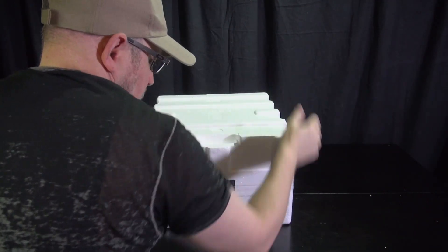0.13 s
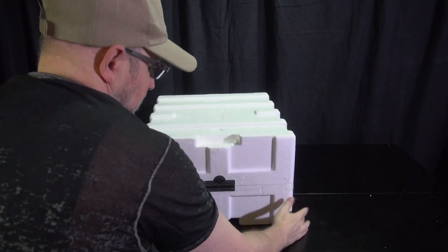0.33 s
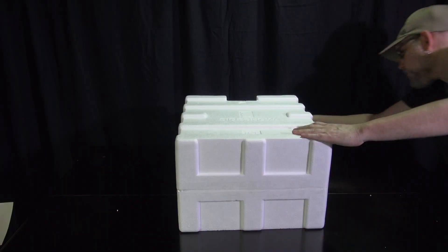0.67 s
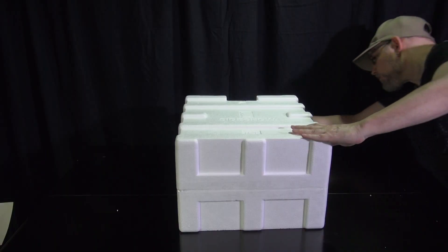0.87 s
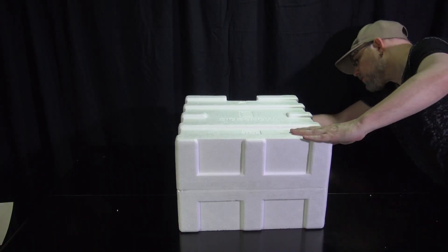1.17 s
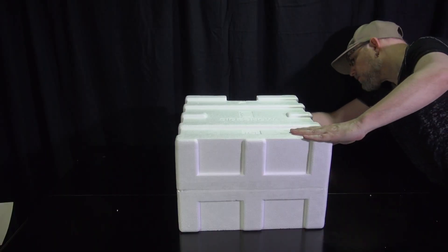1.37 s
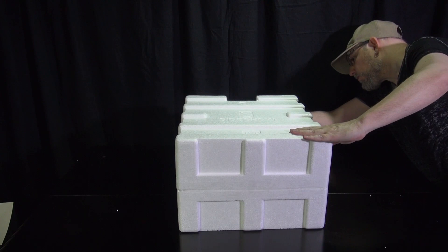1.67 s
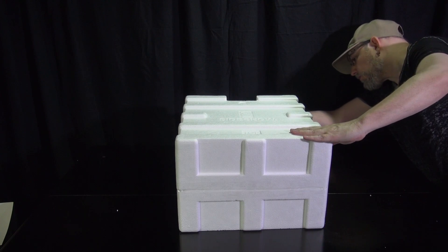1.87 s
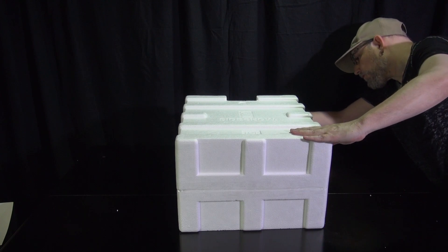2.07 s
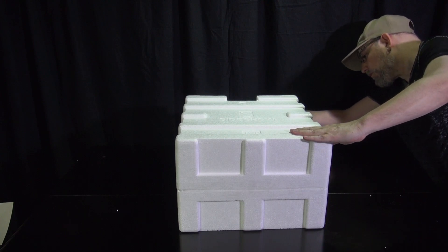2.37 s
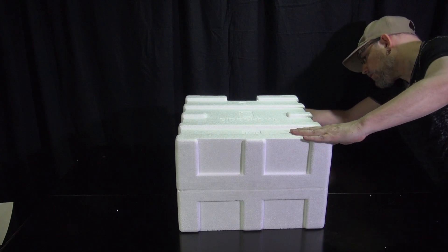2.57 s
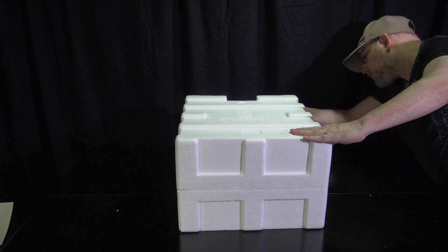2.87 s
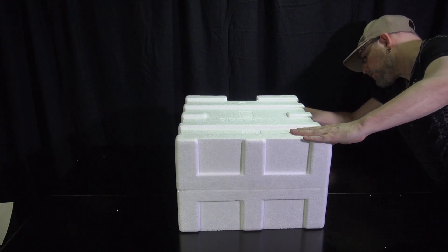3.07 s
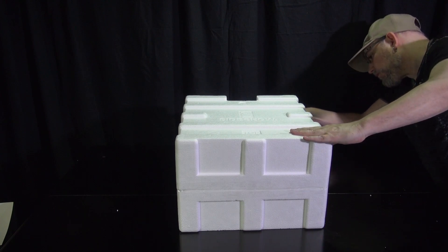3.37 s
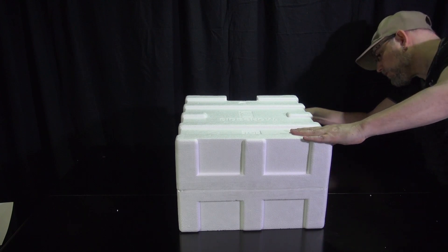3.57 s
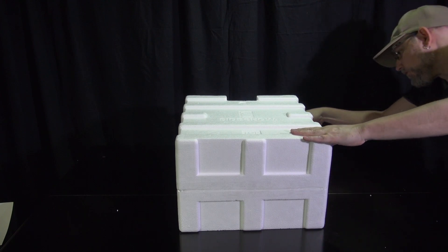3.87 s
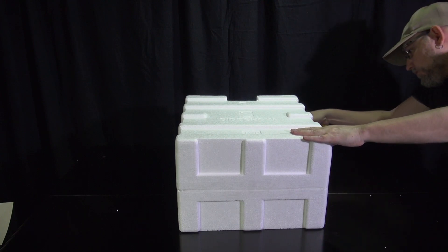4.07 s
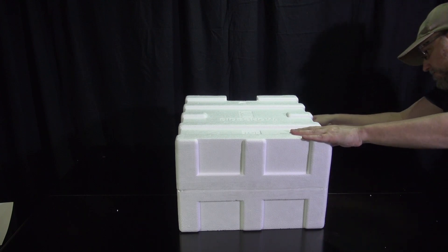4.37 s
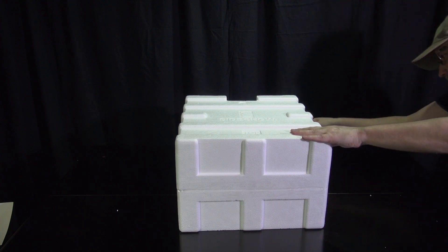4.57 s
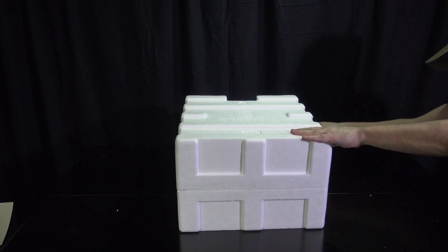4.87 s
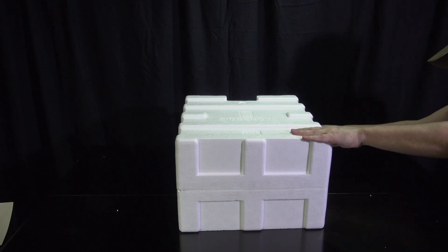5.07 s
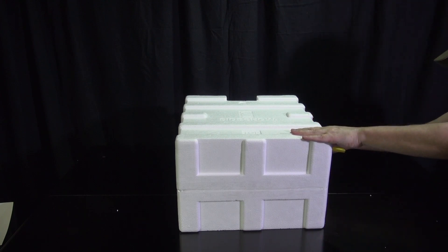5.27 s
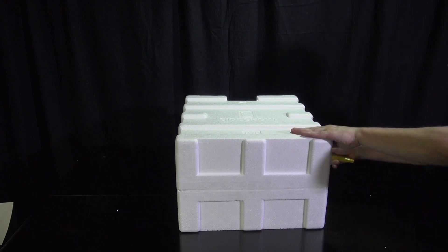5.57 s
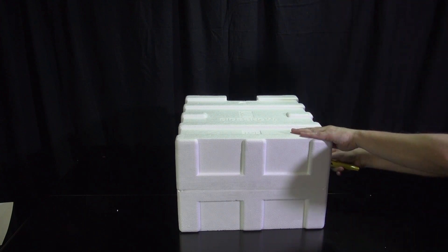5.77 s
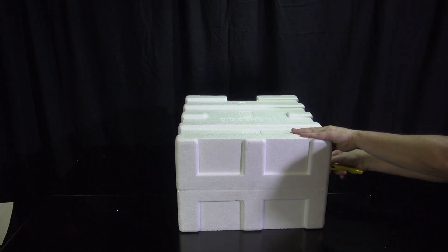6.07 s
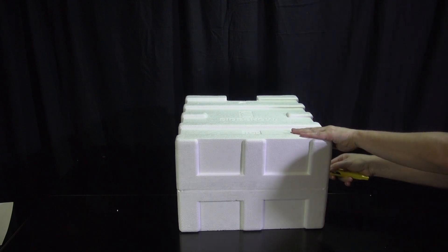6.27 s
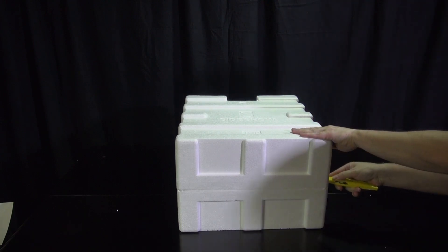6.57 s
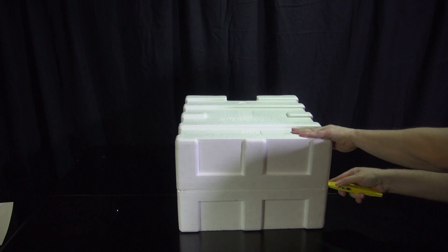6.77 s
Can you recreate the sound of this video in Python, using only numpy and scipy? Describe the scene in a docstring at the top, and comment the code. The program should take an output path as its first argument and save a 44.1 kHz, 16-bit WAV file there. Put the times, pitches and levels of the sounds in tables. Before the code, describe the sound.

Foam box being cut open: dry crunchy scrapes, dull hollow thumps, crisp cracks of tape and foam, growing busier and steadier, heard in the left channel.

```python
"""Cutting open a foam box

A curtained room: on a table, a knife works along the taped seam of a foam shipping box in three cuts.
Random clicks of breaking beads make the rasp; noisy bursts make the knocks, snaps and ticks; wavering
glides make the squeals. The room's short tail sits below the direct sound.
One microphone feeds the left channel; the right holds hiss and a faint leak of the left.
"""
import sys
import numpy as np
from scipy import signal
from scipy.fft import rfft, irfft
from scipy.io import wavfile
from scipy.ndimage import uniform_filter1d

SR = 44100
rng = np.random.default_rng(int(sys.argv[2]) if len(sys.argv) > 2 else 0)


def to_wav(sig):
    """Store sig (one row per channel, or 1-D mono) as 16-bit WAV at the path in sys.argv[1].

    Samples outside -1..1 are clipped; the rate is SR.
    """
    pcm = np.clip(np.atleast_2d(sig), -1, 1) * 32767
    pcm = np.round(pcm).astype(np.int16)
    wavfile.write(sys.argv[1], SR, pcm.T)  # frames by channels


N = 305613
TIME = np.arange(N) / SR

# Soft rush of the room. Each row: frequency in Hz, relative level in dB.
AIR_SPECTRUM = [(25, -51), (50, -4), (100, -7.5), (200, 1), (350, 5), (600, 1), (1100, -2), (2000, -11.5),
                (6000, -20.5), (9000, -25), (16000, -30)]
AIR_DB = -62
HISS_SPECTRUM = [(30, -13.5), (50, 1), (120, 5.5), (350, -3.5), (900, -5.5), (2500, -9.5), (13000, -14.5),
                 (16000, -16)]
# Decay of the room. Each row: frequency in Hz, time to fall by 60 dB in seconds.
ROOM_DECAY = [(200, 0.34), (550, 0.28), (1400, 0.38), (3700, 0.3), (10000, 0.34), (15000, 0.21)]
# Resonances of the hollow box. Each row: frequency in Hz, width in Hz, level in dB.
BOX_MODES = [(223, 41, 1), (266, 40, -5.5), (432, 54, -2), (566, 27, -3), (684, 44, -15), (887, 15, 0.5),
             (1234, 380, -15.5), (1960, 49, -35)]

# Knocks of the box under the hand. Each row: start in seconds, relative level in dB,
# depth in dB (bass over the hollow middle), hardness in dB (lift of the treble).
KNOCKS = [(0.5823, -1, -13, 1), (0.626, 3, -14, -2), (1.3376, 0.5, 0, -6), (1.4268, 1, 10.5, 1.5),
          (1.7958, -12, 9, 7), (2.0582, 0.5, 8, 5.5), (2.6063, 6.5, -2, 8.5), (2.6362, 2.5, 5, 4),
          (2.7202, 11.5, 4, 0), (2.7629, -0.5, 3, 5.5), (2.7942, 2.5, 12, 5), (2.8057, 13.5, -5.5, 2.5),
          (2.8506, 15.5, 4, 0.5), (3.377, -1.5, -16, 4.5), (3.4577, -6, -15, 0), (3.4929, -3.5, -26, 1),
          (3.9237, 7, -1, -2.5), (4.188, -10, 16, -7), (4.3998, 3, -4, -0.5), (4.4799, 3, 1, -4),
          (4.503, -12, 9, -8), (4.5236, 1.5, 14, 0), (5.5959, 0.5, -4, -2), (5.7271, 5.5, 8, 2),
          (5.876, 1.5, -12, -4), (5.9812, 1, 7, 7), (6.7665, 6, 1, 0.5), (6.8493, 3.5, 4, -4)]
# Basic tone of a knock. Each row: frequency in Hz, relative level in dB.
KNOCK_SPECTRUM = [(300, -2), (500, 0.5), (750, -3.5), (1800, -11), (5000, -17.5), (11000, -32)]
KNOCK_CRUMBLE_S = 0.0054
# Tape and foam snapping at the blade. Each row: start in seconds, relative level in dB,
# body in dB (lift of the bass), edge in dB (lift of the top), crumbling time in seconds.
SNAPS = [(0.132, -13, 3, 11.5, 0.0042), (0.312, -20, -19, 14, 0.0029), (0.446, 0.5, 8, 3, 0.0059),
         (0.514, -19, 5, -13, 0.002), (0.6241, -13, 23, 11.5, 0.0065), (0.681, -13.5, 12, 4.5, .0006),
         (0.8488, -12.5, 5, 10.5, 0.006), (1.257, -21.5, 9, 4, 0.0029), (1.4489, -10, 5.5, -26, 0.011),
         (2.1558, -7, 9.5, 1, 0.0044), (2.183, 9.5, -0.5, -9, 0.0015), (2.2239, -1.5, 5, 2, .0026),
         (2.2443, -0.5, 4.5, 0, 0.0089), (2.259, -4, -22, 5, 0.002), (2.3175, -10, -28, -6, 0.0047),
         (2.423, -22.5, -6, -4, 0.0018), (2.6204, 2, 0, 0, 0.0027), (2.6562, -7.5, -7, 3, 0.0017),
         (2.8559, -1.5, 13.5, 7, 0.0073), (2.9232, 4.5, -38, 2, .0022), (3.3122, -18, 13, -11, .0049),
         (3.3827, -1, 0, -7.5, 0.0013), (3.599, -16.5, 2, -9, .004), (3.788, -2, -9, -6.5, 0.0045),
         (3.911, -13, 5, -3, 0.0036), (4.1643, -15.5, 9, -6, 0.0018), (4.457, -8.5, 7, -31, 0.0014),
         (4.5354, -9, 5, -2, 0.0043), (4.587, -14.5, 2, -8, .003), (4.765, -7, 5.5, -14, 0.0035),
         (5.165, 0.5, -2, -14, .0017), (5.3564, -3.5, 8, -3, 0.0049), (5.792, 6.5, -0.5, -0.5, .0035),
         (5.9494, -17, -12, 7.5, 0.003), (6.0366, 0.5, 2.5, -6, 0.0029), (6.4621, 1.5, 2, -8, .0021)]
# Basic tone of a snap. Each row: frequency in Hz, relative level in dB.
SNAP_SPECTRUM = [(300, -10.5), (750, -4), (1800, -3.5), (5000, 0), (11000, -11)]
# Corners of the tone of a knock or snap
BASS_HZ, HOLLOW_HZ, MIDDLE_HZ, CRACK_HZ, EDGE_HZ = 300, 750, 1800, 5000, 11000
# Runs of small ticks as the tape gives way. Each row: start in seconds, number of ticks,
# mean spacing in seconds, relative level in dB.
TICK_RUNS = [(3.996, 8, .021, -14), (4.2, 5, .036, -25)]
# Tone of a tick or a cracking bead. Each row: frequency in Hz, relative level in dB.
TICK_SPECTRUM = [(300, -12), (750, -21), (1800, -9), (5000, -1.5), (11000, -15.5)]
# Squeals of the blade in the foam. Each row: start in seconds, length in seconds,
# first pitch in Hz and last pitch in Hz before wavering, relative level in dB.
SQUEALS = [(1.801, .01, 12500, 11000, -39.5), (1.823, 0.014, 5560, 4980, -35),
           (1.875, 0.014, 9160, 8530, -37.5), (1.899, .04, 11560, 9700, -32.5),
           (1.942, 0.072, 7800, 11940, -35), (2.858, 0.0062, 9480, 3880, -24.5),
           (2.912, 0.011, 6550, 4980, -29), (3.193, .008, 3920, 4360, -31.5),
           (3.203, 0.02, 5000, 8670, -29.5), (3.245, .005, 7860, 7260, -34),
           (5.009, 0.027, 6620, 6580, -42.5), (5.068, .055, 7000, 4230, -44),
           (5.094, 0.05, 10250, 11340, -48), (5.244, .07, 7540, 7280, -40.5),
           (5.412, .0051, 5080, 5100, -40), (5.497, 0.039, 7840, 9850, -47.5),
           (6.269, 0.0068, 6960, 6670, -47), (6.393, 0.057, 12300, 15300, -46),
           (6.606, 0.021, 12600, 11500, -36), (6.64, .06, 11430, 9170, -44.5)]

# The three cuts along the seam. Each row: start in seconds, end in seconds.
CUTS = [(0.44, 4.3), (4.4, 5.93), (5.96, 7.0)]
# Strokes of blade and hand. Each row: time of full onset in seconds, length in seconds, relative rasp in dB,
# weight in dB (drumming of the box over the rasp), bite in dB (hiss over the rasp),
# swell in dB (from start to end; the rasp level holds midway).
STROKES = [(0.47, 0.048, -51.5, -2.5, -2.5, -5), (0.61, 0.045, -66, 2, 2, -8),
           (0.836, 0.12, -60.5, -0.5, -0.5, -11.5), (0.927, 0.28, -70.5, -4, -1, 0),
           (1.449, 0.027, -66, -4, 5.5, -8), (1.56, .12, -55, -2, -16, 6), (1.79, 0.1, -49, -9.5, 2.5, -6),
           (1.88, 0.14, -55, 2, -6, 7), (2.023, 0.077, -45.5, -5.5, 0.5, 2.5),
           (2.121, 0.26, -56.5, -6, -6, -24), (2.62, 0.021, -48, 6, 3, -6),
           (2.762, 0.047, -47.5, -1, -11, 5), (2.885, 0.061, -43, -8.5, -4, 10.5),
           (3.006, 0.034, -46.5, -5.5, -11.5, 4.5), (3.09, 0.12, -43.5, -10.5, -10, -8),
           (3.2, 0.026, -41, -11, 5, -1), (3.248, 0.092, -48, -3, -8, -12),
           (3.493, 0.021, -43.5, -2.5, -24, -6.5), (3.776, 0.14, -52.5, -1.5, -10, -11.5),
           (3.878, 0.25, -73.5, 13.5, 3, 0), (4.445, 0.075, -55, 5.5, -17, 9),
           (4.58, 0.108, -63, 1.5, -6, -1), (4.708, 0.11, -51.5, 1.5, -13, 6.5),
           (4.811, 0.063, -46, -5.5, -10, -3), (4.932, 0.13, -51, -6.5, -10.5, 11),
           (5.008, 0.15, -51, -8.5, 2.5, 9.5), (5.187, 0.19, -50, -2, 1.5, -8.5),
           (5.337, 0.3, -51, -4.5, -2.5, -4.5), (5.62, 0.097, -48.5, 1, -5.5, 2.5),
           (5.748, .11, -46.5, -1, -6, 1.5), (5.997, 0.086, -42.5, -5, -7, -0.5),
           (6.083, 0.25, -48.5, -13, -4.5, -3), (6.307, 0.32, -50, -10, -0.5, -1),
           (6.633, 0.117, -45.5, -9.5, 3, 0.5), (6.754, 0.09, -44, -10, 0, -0.5),
           (6.842, 0.081, -47, -8.5, -4.5, 5.5)]
STROKE_ATTACK_S, STROKE_RELEASE_S = 0.018, 0.02
# Blade resting on the foam between strokes, barely rubbing. One row: rasp in dB, weight in dB, bite in dB.
RESTING = (-79.5, 0, -8)
# Resonances of blade and wall in each cut. Each row: frequency in Hz, width in Hz, level in dB.
FIRST_RING = [(766, 450, -10.5), (1490, 120, -36.5), (2870, 110, 1.5), (4080, 400, 1.5), (4660, 450, -17),
              (5200, 350, -16.5)]
SECOND_RING = [(170, 75, -12), (472, 380, 1), (2300, 1100, -5), (4140, 690, 5), (5100, 220, -2),
               (7340, 180, -1)]
THIRD_RING = [(433, 180, -5), (930, 140, -11), (1303, 62, -3), (2090, 190, -1.5), (2700, 190, -9),
              (3900, 370, 3.5), (4370, 130, -2), (4800, 190, 2), (6850, 110, -11), (10550, 220, -5)]
# Tone of the rasping foam. Each row: frequency in Hz, relative level in dB.
RASP_SPECTRUM = [(100, -18.5), (190, 0), (400, 4), (700, 6), (1100, 3.5), (2000, 1), (4200, -5.5),
                 (6000, -7.5), (8000, -12), (12000, -11.5), (16000, -19.5)]
# Loose beads cracking under the blade: how many, base level over the rasp gain, spread of their sizes
CRUMB_COUNT, CRUMB_DB, CRUMB_SPREAD_DB = 150, 26, 3.5

TOP_HZ = 16100  # upper limit of the recorder


def undb(db):
    """Decibels to gain."""
    return 10 ** (np.asarray(db) / 20)


def unit(x):
    """Scale to rms 1."""
    return x / np.sqrt(np.mean(x ** 2))


def add(track, s, sound):
    """Mix a sound into a track at time s in seconds."""
    i = max(int(s * SR), 0)
    track[i:i + len(sound)] += sound[:max(N - i, 0)]


def band(x, lo_hz, hi_hz, order=3):
    """Causal band-pass."""
    edges = [lo_hz, min(hi_hz, SR / 2 - 100)]
    return signal.sosfilt(signal.butter(order, edges, "band", fs=SR, output="sos"), x)


def colour(x, points, size=2048):
    """Causal filter through (Hz, dB) points, built from the cepstrum."""
    hz, db = np.transpose(points)
    grid = np.maximum(np.fft.rfftfreq(size, 1 / SR), 1)
    cepstrum = irfft(np.log(undb(np.interp(np.log(grid), np.log(hz), db))))
    # fold onto positive time, so the filter answers only after the sound
    cepstrum[1:size // 2] *= 2
    cepstrum[size // 2 + 1:] = 0
    response = irfft(np.exp(rfft(cepstrum)))
    return signal.fftconvolve(x, response)[:len(x)]


def shelf(points, flat_hz, full_hz, db):
    """Lift a spectrum by db at full_hz and beyond, leaving it alone from flat_hz on the other side."""
    span = np.log(full_hz / flat_hz)
    return [(hz, level + db * np.clip(np.log(hz / flat_hz) / span, 0, 1)) for hz, level in points]


def ring(x, modes):
    """Sum of resonances (Hz, width, dB) driven by a sound."""
    return sum(undb(db) * signal.lfilter(*signal.iirpeak(hz, hz / width, fs=SR), x) for hz, width, db in modes)


def walk(rate, size=N):
    """Random levels joined by straight lines, rate levels a second."""
    place = np.arange(size) * rate / SR
    knots = rng.standard_normal(size // 8 + 2)
    return np.interp(place, np.arange(len(knots)), knots)


def line_hiss(hiss_db):
    """Steady shaped noise, the same in both channels."""
    return undb(hiss_db) * unit(colour(rng.standard_normal(N), HISS_SPECTRUM))


def air():
    """The soft, steady rush of the room, as shaped noise."""
    return undb(AIR_DB) * unit(colour(rng.standard_normal(N), AIR_SPECTRUM))


def room(x, wet_db=-10.0, build_s=0.00076, size=20000):
    """Table, walls and curtains return a short, dense tail, each band of it with its own decay."""
    t = np.arange(size) / SR
    hz, t60 = np.transpose(ROOM_DECAY)
    edges = np.geomspace(100, 18000, 9)
    tail = 0
    for lo, hi in zip(edges, edges[1:]):
        decay_s = np.interp(np.log(lo * hi) / 2, np.log(hz), t60)
        tail = tail + band(rng.standard_normal(size), lo, hi) * np.exp(-np.log(1000) * t / decay_s)
    tail = unit(tail * (1 - np.exp(-t / build_s))) / np.sqrt(size)
    return x + undb(wet_db) * signal.fftconvolve(x, tail)[:N]


def walls(x, size=400):
    """Short waves bounce about in the foam walls for a few milliseconds and comb the treble."""
    bounce_s, share = 0.003, 0.5
    bounces = band(rng.standard_normal(size), 2440, 11100) * np.exp(-np.arange(size) / SR / bounce_s)
    return x + share * signal.fftconvolve(x, unit(bounces) / np.sqrt(size))[:N]


def slip(spectrum, crumble_s, crumble_db=6.5, ring_db=0.0, gain_db=-2.0, size=4096):
    """A sudden slip is one sharp push and a short crumbling of beads; the box rings after it."""
    t = np.arange(size) / SR
    push = undb(crumble_db) * rng.standard_normal(size) * np.exp(-t / max(crumble_s, 1 / SR))
    # after scaling to one energy, the push stands out less the longer the foam crumbles
    push[0] += 7
    push = band(push + undb(ring_db) * ring(push, BOX_MODES), 281, 23300)
    return colour(undb(gain_db) * unit(push) / np.sqrt(size), spectrum)


def knocks(hard_hz=3000):
    """Dull knocks of the hollow box: a deep one trades middle for bass, a hard one has more treble."""
    out = np.zeros(N)
    for s, db, depth_db, hardness_db in KNOCKS:
        spectrum = shelf(KNOCK_SPECTRUM, HOLLOW_HZ, BASS_HZ, depth_db)
        spectrum = shelf(spectrum, MIDDLE_HZ, HOLLOW_HZ, -depth_db / 2)
        spectrum = shelf(spectrum, HOLLOW_HZ, hard_hz, hardness_db)
        add(out, s, undb(db) * slip(spectrum, KNOCK_CRUMBLE_S))
    return out


def snaps():
    """Cracks of tape and foam; some shake the box, some have a sharp edge."""
    out = np.zeros(N)
    for s, db, body_db, edge_db, crumble_s in SNAPS:
        spectrum = shelf(SNAP_SPECTRUM, MIDDLE_HZ, HOLLOW_HZ, body_db)
        spectrum = shelf(spectrum, CRACK_HZ, EDGE_HZ, edge_db)
        add(out, s, undb(db) * slip(spectrum, crumble_s))
    return out


def ticks(jitter=0.18, spread_db=0.5, crumble_s=0.0018):
    """The tape parts in small steps, uneven in time and size; jitter is a share of the spacing."""
    out = np.zeros(N)
    for start, count, spacing_s, db in TICK_RUNS:
        for k, (late, loud) in enumerate(rng.standard_normal((int(round(count)), 2))):
            tick = undb(db + spread_db * loud) * slip(TICK_SPECTRUM, crumble_s)
            add(out, start + spacing_s * (k + jitter * late), tick)
    return out


def squeals(waver=0.061, waver_rate=1100, wander=0.039, flutter_db=4.0, catch_db=1.2,
            octave_db=-9.0, grit_db=-11.0, gain_db=2.5, edge_s=0.00041):
    """Foam sticks and slips thousands of times a second: a wavering glide with its octave and a little grit."""
    out = np.zeros(N)
    # changes of grip bend pitch and level; single slips also come early or late
    slips = 0.06 * walk(4500)
    drift = waver * walk(waver_rate) + wander * walk(90) + slips
    grip_db = flutter_db * walk(700) + catch_db * walk(90)
    grit = unit(band(rng.standard_normal(N), 2760, 23000, order=1))
    for s, length, first_hz, last_hz, db in SQUEALS:
        t = np.arange(int(length * SR) + 2) / SR
        part = slice(int(s * SR), int(s * SR) + len(t))
        hz = np.geomspace(first_hz, last_hz, len(t)) * (1 + drift[part])
        phase = 2 * np.pi * np.cumsum(hz) / SR
        # the octave is dropped where it would pass half the sample rate
        octave = np.sin(2 * phase) * (2 * hz < SR / 2)
        tone = np.sin(phase) + undb(octave_db) * octave + undb(grit_db) * grit[part]
        fade = np.minimum(np.minimum(t, t[-1] - t) / edge_s, 1)
        grip = fade * undb(grip_db[part])
        add(out, s, undb(db + gain_db) * unit(tone * grip))
    return walls(out)


def crumbs(rasp_gain, crumble_s=0.001):
    """Single beads crack at random moments, the louder the harder the blade works."""
    out = np.zeros(N)
    for when, loud in rng.random((CRUMB_COUNT, 2)):
        over_db = CRUMB_DB + CRUMB_SPREAD_DB * min(-np.log(1 - loud), 3)
        gain = rasp_gain[int(when * N)] * undb(over_db)
        add(out, when * N / SR, gain * slip(TICK_SPECTRUM, crumble_s, size=1024))
    return out


def chirps(length_s=0.0022, glide=0.12, spread_db=6.0, count=3500):
    """Beads catch on the blade and chirp for a few milliseconds, a crowd of them; the high ones are weaker."""
    out = np.zeros(N)
    for when, pitch, stretch, bend, loud in rng.random((count, 5)):
        along = np.linspace(0, 1, int(length_s * (0.5 + stretch) * SR) + 8)
        start_hz = np.interp(pitch, [0, 1], [6000, 14000])
        hz = start_hz * (1 + glide * (2 * bend - 1) * along)
        size = undb(spread_db * min(-np.log(1 - loud), 2)) / hz
        tone = np.sin(2 * np.pi * np.cumsum(hz) / SR)
        add(out, when * N / SR, size * np.sin(np.pi * along) * tone)
    return unit(out)


def layer_gains(db, weight_db, bite_db):
    """Gains of drumming, rasp and hiss, one row each."""
    return undb([[db + weight_db], [db], [db + bite_db]])


def effort(start, end):
    """Layer gains in one cut: each stroke sets in, swells or fades as it runs, and dies away."""
    inside = 1. * ((TIME >= start) & (TIME <= end))
    gains = layer_gains(*RESTING) * uniform_filter1d(inside, size=400)
    for s, length, db, weight_db, bite_db, swell_db in STROKES:
        if start <= s < end:
            attack = np.clip((TIME - s) / STROKE_ATTACK_S + 1, 0, 1) ** 2
            release = np.exp(-np.maximum(TIME - s - length, 0) / STROKE_RELEASE_S)
            swell = undb(swell_db * np.interp(TIME, [s, s + length], [-0.5, 0.5]))
            stroke = layer_gains(db, weight_db, bite_db) * attack * release * swell
            gains = np.maximum(gains, stroke)
    return gains


def cut(gains, modes, bead_rate, spread_db, judder_db, lurch_db, catch_db, chirp_db, ring_db, gain_db):
    """The blade breaks bead after bead in uneven spurts; the clicks ring blade and wall and drum on the box."""
    # bead_rate is the mean number of clicks a second
    clicks = (rng.random(N) < bead_rate / SR) * rng.standard_normal(N)
    size_db = spread_db * np.minimum(rng.exponential(size=N), 5)
    clicks *= undb(size_db + judder_db * (walk(70) + walk(300)))
    blade = undb(ring_db) * ring(clicks, modes)
    rasp = colour(walls(clicks) + blade + ring(clicks, BOX_MODES), RASP_SPECTRUM)
    edges = [150, 1000, 6500, 18000]  # Hz
    drum, scrape, hiss = (unit(band(rasp, lo, hi)) for lo, hi in zip(edges, edges[1:]))
    # the whole box gives way in lurches under the hand; the hiss flares whenever the edge catches
    drum = drum * undb(lurch_db * walk(60))
    hiss = unit((hiss + undb(chirp_db) * chirps()) * undb(catch_db * walk(45)))
    return undb(gain_db) * sum(x * gain for x, gain in zip((drum, scrape, hiss), gains))


def scene(leak_db=-54.5, hiss_db=-76.0):
    """Three cuts among knocks, snaps and squeals at the left; a trace leaks into the hiss of the right."""
    efforts = [effort(start, end) for start, end in CUTS]
    first = cut(efforts[0], FIRST_RING, bead_rate=12000, spread_db=1.5, judder_db=2.0, lurch_db=4.0,
                catch_db=2.5, chirp_db=-22.0, ring_db=6.0, gain_db=-1.5)
    second = cut(efforts[1], SECOND_RING, bead_rate=13000, spread_db=1.0, judder_db=2.0, lurch_db=3.0,
                 catch_db=2.5, chirp_db=-1.5, ring_db=4.0, gain_db=1.5)
    third = cut(efforts[2], THIRD_RING, bead_rate=25000, spread_db=0.0, judder_db=2.2, lurch_db=-1.3,
                catch_db=1.0, chirp_db=-13.0, ring_db=4.5, gain_db=-1.0)
    rasp_gain = sum(efforts)[1]
    blade = first + second + third + crumbs(rasp_gain)
    left = room(knocks() + snaps() + ticks() + squeals() + blade) + air()
    hiss = line_hiss(hiss_db)
    return np.array([left + hiss, undb(leak_db) * left + hiss])


def record(dry):
    """The recorder cuts the top steeply, with an elliptic low-pass."""
    return signal.sosfilt(signal.ellip(10, 0.2, 80, TOP_HZ, fs=SR, output="sos"), dry)


dry = scene()
out = record(dry)
to_wav(out)
```